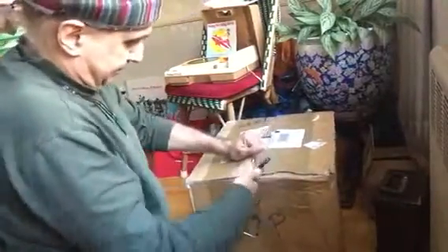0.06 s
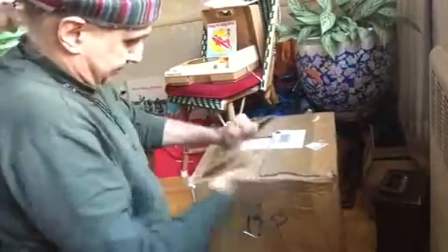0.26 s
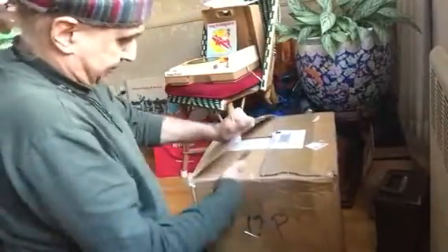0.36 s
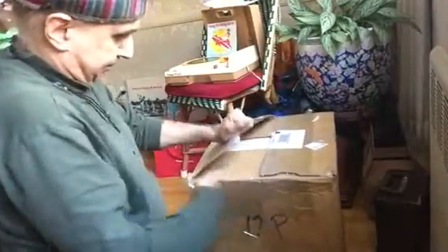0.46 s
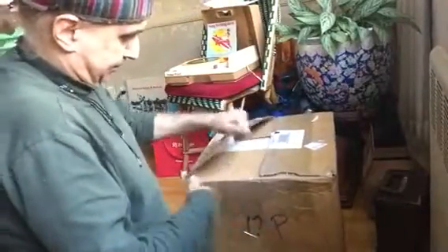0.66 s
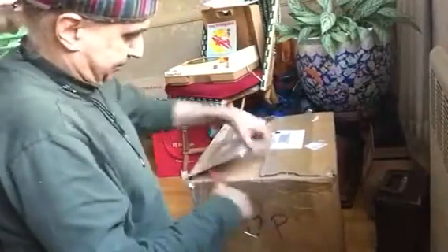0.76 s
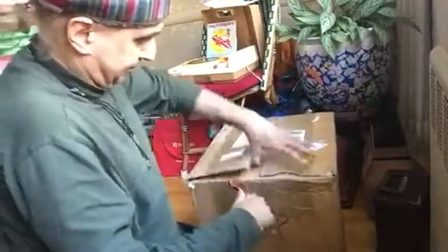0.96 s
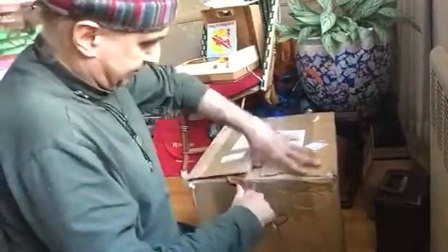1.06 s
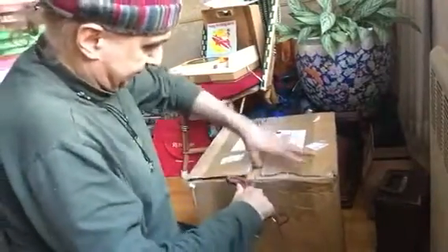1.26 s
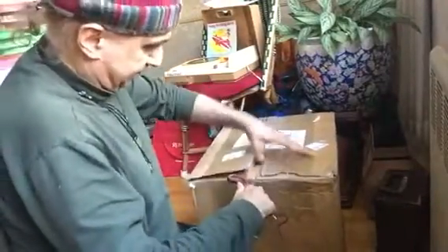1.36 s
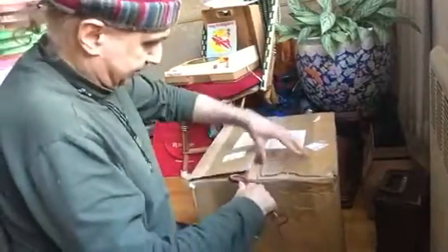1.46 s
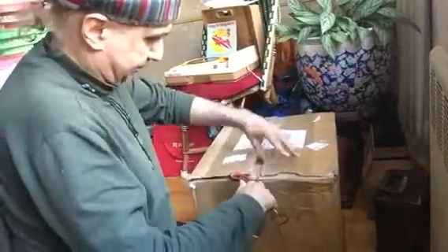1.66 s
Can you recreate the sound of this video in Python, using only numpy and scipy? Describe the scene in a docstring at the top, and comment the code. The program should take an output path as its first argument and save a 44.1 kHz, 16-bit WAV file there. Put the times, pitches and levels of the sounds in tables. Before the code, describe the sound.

Packing tape rips off a hollow cardboard box in short crackling bursts, close up, quiet room

```python
"""Packing tape on a cardboard box in a quiet room, heard by a microphone close by.
Over steady room air and rumble the pull begins as faint crackle of glue threads, with a first snap;
a blade hisses along the seam, and soft booms ring the air in the hollow box. Then the crackle surges
in bursts of shaped noise, with snaps (short rings and fizz) and knocks on the flap (decaying modes).
Late on a hand brushes the cardboard, a hum and a hiss, among the last small crackles and snaps."""
import sys
import numpy as np
from scipy import signal
from scipy.fft import rfft, irfft
from scipy.io import wavfile
from scipy.ndimage import uniform_filter1d

SR = 44100
rng = np.random.default_rng(int(sys.argv[2]) if len(sys.argv) > 2 else 0)


def makeup_ratio(level_db):
    """Linear amplitude ratio for a level in decibels (20 dB per factor of ten)."""
    decades = np.asarray(level_db, float) / 20
    return 10 ** decades


def store_pcm(level_fs):
    """Save levels as 16-bit WAV."""
    pcm = np.round(np.clip(level_fs, -1, 1) * 32767).astype(np.int16)
    wavfile.write(sys.argv[1], SR, np.atleast_2d(pcm).T)


N = 74970  # samples, 1.7 s


def evened(x):
    """Scales a sound to an rms of one."""
    return x / np.sqrt(np.mean(x ** 2) + 1e-20)


def peaked(x):
    """Scales a sound to a peak of one."""
    return x / (np.abs(x).max() + 1e-20)


def read(points, hz):
    """Reads a curve of (frequency, value) points along a logarithmic frequency axis."""
    f, value = np.transpose(points)
    return np.interp(np.log(hz + 1), np.log(f + 1), value)


def add(mix, s, sound):
    """Lays a sound into the mix from time s, cut off at the end of the mix."""
    part = mix[max(round(s * SR), 0):][:len(sound)]
    part += sound[:len(part)]


def resonate(x, hz, width_hz):
    """Two-pole resonance."""
    r = np.exp(-np.pi * width_hz / SR)
    return signal.lfilter([1, 0, -1], [1, -2 * r * np.cos(2 * np.pi * hz / SR), r * r], x)


def floor():
    """Room air, low rumble and microphone hiss: steady noise of one colour."""
    # spectrum of the background: f/Hz, relative level/dB
    background = [(18, -48), (30, -7.5), (161, 2), (499, -19.5), (1960, -28.5), (3220, -28), (6380, -38),
                  (13000, -39), (16000, -50)]
    level_db = -62
    colour = makeup_ratio(read(background, np.fft.rfftfreq(N, 1 / SR)))
    hiss = irfft(rfft(rng.standard_normal(N)) * colour, N)
    return makeup_ratio(level_db) * evened(hiss)


def flap_ring(t, tilt_db, bend=1):
    """The flap's modes after one blow; tilt (dB per octave) weights them, bending shifts them all."""
    # cardboard flap modes: f/Hz (unbent), level/dB (before tilt), t60/s
    modes = [(653, 6.5, 0.042), (740, 5, 0.044), (1062, -1.5, 0.06), (1260, 7.5, 0.036), (1790, -9, 0.075),
             (2376, 3, 0.06), (2629, 6, 0.077), (3124, 2, 0.068), (3590, 3, 0.017), (4760, -1, .008),
             (6500, -11, 0.0068)]
    lowest_hz = modes[0][0]
    ring = 0
    for hz, db, t60 in modes:
        decay = makeup_ratio(db + tilt_db * np.log2(hz / lowest_hz) - 60 * t / t60)
        ring = ring + decay * np.sin(2 * np.pi * hz * bend * t)
    return ring


def pull():
    """Thousands of tiny glue threads tear each second, crackling in the tape and rattling the flap."""
    # course of the pull: t/s, crackle level/dB, brightness/(dB per octave)
    course = [(0, -62.5, 0.5), (0.094, -58, -1), (0.121, -69, -1.5), (0.164, -59.5, -0.5),
              (0.204, -47.5, -2.5), (.222, -30.5, 2), (0.241, -38.5, -0.5), (0.252, -25, 1),
              (0.307, -45, 0.5), (0.319, -34.5, 5), (0.362, -41.5, 0.5), (0.427, -57.5, 1),
              (.46, -74.5, 2.5), (0.515, -70.5, 2.5), (0.519, -42, 0), (0.572, -37, 3.5),
              (0.619, -48.5, 0.5), (0.659, -55.5, -0.5), (0.671, -48.5, 5), (0.724, -68.5, 1.5),
              (0.744, -49, 1), (0.82, -51, 2.5), (0.897, -65, 1.5), (0.928, -55, -2.5), (1.025, -69, -0.5),
              (1.33, -70.5, -0.5), (1.338, -54.5, 1), (1.39, -69, 0), (1.442, -57.5, 1), (1.48, -77, 3.5)]
    # colour of the tearing tape: f/Hz, relative level/dB
    tape = [(180, 1.5), (300, -5), (603, 4), (1560, -0.5), (2610, -2.5), (3760, -3), (7440, -6.5),
            (16000, -20)]
    crackles_per_s, size_spread_db, grain_s = 6000, 3.5, 0.0002
    patchy_db = 2.5
    # rattle against crackle; duller pulls shake the flap more
    rattle_base_db, rattle_db_per_brightness = -14, -1
    rattle_tilt_db = 3.5  # per octave
    s, db, bright = np.transpose(course)
    rattle_db = rattle_base_db + rattle_db_per_brightness * bright

    torn = rng.random(N) < crackles_per_s / SR
    size = makeup_ratio(size_spread_db * np.minimum(rng.exponential(1, N), 5)) * torn
    grains = signal.lfilter([1], [1, -np.exp(-1 / (grain_s * SR))], size)
    threads = grains * rng.standard_normal(N)

    hz, t, z = signal.stft(threads, SR, nperseg=256, noverlap=192)
    # random patches, smooth over time and frequency, make the crackle uneven
    patches = uniform_filter1d(rng.standard_normal(z.shape[::-1]), 10, 0)
    patches = evened(uniform_filter1d(patches, 5, 1)).T
    # brightness turns about 4 kHz
    tilt = np.log2(np.maximum(hz, 500) / 4000)[:, None] * np.interp(t, s, bright)
    colour = makeup_ratio(read(tape, hz)[:, None])
    shaped = z * colour * makeup_ratio(tilt + patchy_db * patches)
    crackle = signal.istft(shaped, SR, nperseg=256, noverlap=192)[1][:N]

    ring = flap_ring(np.arange(4096) / SR, rattle_tilt_db)
    rattle = evened(signal.oaconvolve(threads, ring)[:N])
    time = np.arange(N) / SR
    both = evened(crackle) + makeup_ratio(np.interp(time, s, rattle_db)) * rattle
    return makeup_ratio(np.interp(time, s, db)) * both


def snaps():
    """A sharp pulse and brief splintering ring the loose tape and the flap under it, and fizz on top."""
    # single snaps: t/s (before the delay), peak level of the ring/dB, ring f/Hz, fizz over ring/dB
    snap_list = [(0.0142, -40.5, 2650, 7.5), (0.2098, -37, 1500, 10), (0.2487, -18, 2450, 7),
                 (0.3299, -39, 2630, 8), (0.5656, -43, 2640, 0), (0.607, -37.5, 2570, 9),
                 (0.6696, -40.5, 2330, -1), (0.7419, -39.5, 2170, 17), (0.7497, -40.5, 3470, -9),
                 (0.7803, -28, 3430, -2), (0.827, -42, 1120, 0), (0.9203, -37.5, 2170, -10),
                 (0.9214, -38, 1620, -18), (1.3336, -34, 1260, 12.5), (1.3997, -41.5, 3140, 5),
                 (1.4287, -49, 2550, -24), (1.4368, -41.5, 6500, -6), (1.442, -46.5, 1260, 6),
                 (1.499, -45, 3500, -26), (1.5894, -54, 1240, -31), (1.6181, -36, 3500, -8)]
    delay_s = 0.0008  # each snap sounds this long after its listed time
    pulse_size = 5  # the sharp pulse that opens each snap, against the splintering noise
    crack_s, treble_crack_s = 0.0013, 0.0013
    ring_width_hz, treble_hz = 900, 5500
    broad_db, tilt_db = 10, -4.5  # flap over ring, fall of its modes per octave
    thin_hz, grip_s = 2950, 0.004  # snaps ringing above this hardly move the flap; the tape damps it soon
    t, out = np.arange(1024) / SR, np.zeros(N)
    body = np.gradient(flap_ring(t, tilt_db) * np.exp(-t / grip_s))
    high = signal.butter(4, treble_hz, "high", fs=SR, output="sos")
    noises = rng.standard_normal((len(snap_list), 2, 1024))
    for (s, db, hz, treble_db), noise in zip(snap_list, noises):
        crack = (noise[0] + pulse_size * (t < 2.5 / SR)) * np.exp(-t / crack_s)
        ring = resonate(crack, hz, ring_width_hz)
        ring = peaked(resonate(ring, hz, ring_width_hz * 2))
        treble_crack = (noise[1] + pulse_size * (t < 1 / SR)) * np.exp(-t / treble_crack_s)
        fizz = peaked(signal.sosfilt(high, treble_crack))
        flap = peaked(np.convolve(crack * np.exp(-t / crack_s), body)[:1024])
        flap_gain = makeup_ratio(broad_db) / (1 + (hz / thin_hz) ** 10)
        add(out, s + delay_s, makeup_ratio(db) * (ring + flap_gain * flap + makeup_ratio(treble_db) * fizz))
    return out


def stroke(s, length, db):
    """Quick rise, hold, softer fall to silence a quarter length beyond the nominal end."""
    u = (np.arange(N) / SR - s) / length
    rise, fall = u * 4, (1 - u) * 2 + 0.5
    return makeup_ratio(db) * np.clip(np.minimum(rise, fall), 0, 1)


def rubs():
    """Smooth rubbing noise: the blade hisses in the seam; the hand sets the flap humming and hisses."""
    # blade dragging along the seam: t/s, nominal length/s, level/dB, f/Hz, width/Hz
    drag = (.03, .07, -64, 5600, 1200)
    # hand brushing over the cardboard: t/s, nominal length/s, level of the hum/dB
    brush = (1.026, 0.042, -54)
    hand_tilt_db = -3.5  # per octave
    brush_hiss_hz, brush_hiss_db = 5800, -10  # hiss lies above this, level against the hum
    hand, blade, air = rng.standard_normal((N, 3)).T
    s, length, db, hz, width_hz = drag
    scrape = evened(resonate(resonate(blade, hz, width_hz), hz, width_hz))
    hum = evened(signal.oaconvolve(hand, flap_ring(np.arange(4096) / SR, hand_tilt_db))[:N])
    high = signal.butter(4, brush_hiss_hz, "high", fs=SR, output="sos")
    hiss = evened(signal.sosfilt(high, air))
    return stroke(s, length, db) * scrape + stroke(*brush) * (hum + makeup_ratio(brush_hiss_db) * hiss)


def box():
    """The air in the box swells and dies after each push; two sways add brief low tones."""
    # pushes that set the box's air ringing: t/s, peak level/dB, f/Hz
    booms = [(0.087, -46.5, 123), (0.24, -33, 152), (0.368, -43.5, 131.4), (0.523, -37.5, 129),
             (0.56, -35.5, 127.5), (0.642, -47.5, 131), (0.792, -49.5, 133), (0.916, -45, 133),
             (0.975, -34, 125.2), (1.052, -45.5, 117.6), (1.26, -44, 128), (1.341, -51, 162.6),
             (1.435, -53.5, 131)]
    # the box swaying as the flap lifts: t/s (middle), peak level/dB, f/Hz, length/s
    sways = [(0.39, -54.5, 46, 0.084), (0.33, -49, 105, 0.14)]
    rise_s, t60_s = 0.0038, 0.14
    t, out = np.arange(SR // 2) / SR, np.zeros(N)
    swell = peaked((1 - np.exp(-t / rise_s)) ** 2 * makeup_ratio(-60 * t / t60_s))
    for s, db, hz in booms:
        add(out, s, makeup_ratio(db) * swell * np.sin(2 * np.pi * hz * t))
    time = np.arange(N) / SR
    for s, db, hz, length in sways:
        bell = np.exp(-(2 * (time - s) / length) ** 2)
        out += makeup_ratio(db) * bell * np.sin(2 * np.pi * hz * (time - s))
    return out


def knocks():
    """Each soft blow rings the flap, its low modes most."""
    # blows on the flap: t/s, peak level/dB, bend (factor on the modes' pitch)
    blows = [(0.22, -21, 1.055), (0.235, -29.5, 0.94), (0.519, -30.5, 1.06), (0.743, -32, 0.94),
             (0.972, -44, 1.17), (1.07, -51.5, 0.58), (1.258, -55, 0.78), (1.432, -50, 0.99)]
    tilt_db, rise_s = -14, 0.0012  # tilt per octave
    t, out = np.arange(4096) / SR, np.zeros(N)
    for s, db, bend in blows:
        ring = flap_ring(t, tilt_db, bend) * (1 - np.exp(-t / rise_s))
        add(out, s, makeup_ratio(db) * peaked(ring))
    return out


def room(x):
    """The room's echo: sparse taps of random sign, each band dying at its own speed."""
    # reverberation of the room: f/Hz, t60/s
    decay = [(800, 0.29), (2500, 0.29), (14000, 0.075)]
    taps = np.zeros(SR // 2)
    at = np.arange(60, SR // 2 - 12, 12)  # one tap in every 12 samples
    taps[at + rng.integers(0, 12, at.shape)] = rng.choice([-1., 1.], at.shape)
    hz, t, z = signal.stft(taps, SR, nperseg=128)
    dying = z * makeup_ratio(-60 * t / read(decay, hz)[:, None])
    tail = signal.istft(dying, SR, nperseg=128)[1]
    return signal.fftconvolve(x, tail / np.linalg.norm(tail))[:N]


def scene():
    """Tape, flap and rubbing with their echo in the room, over the box's air and the background."""
    room_db = -13
    background = floor()
    near = pull() + snaps() + rubs() + knocks()
    return (background + near + makeup_ratio(room_db) * room(near) + box())[None]


def roll_off(x):
    """The treble ends steeply here."""
    return signal.sosfilt(signal.butter(12, 16800, fs=SR, output="sos"), x)


def record(dry):
    """The close microphone drops the deepest bass and the top, and dips in the treble."""
    low_hz, top_hz = 40, 15700
    dip_hz, dip_width_hz, dip_db = 10400, 600, -6
    hz = np.fft.rfftfreq(N, 1 / SR)
    dip = makeup_ratio(dip_db * np.exp(-((hz - dip_hz) / dip_width_hz) ** 2))
    top_cut = 1 / (1 + (hz / top_hz) ** 40)
    dipped = irfft(rfft(dry) * dip * top_cut, N)
    low_cut = signal.butter(4, low_hz, "high", fs=SR, output="sos")
    return roll_off(signal.sosfilt(low_cut, dipped))


dry = scene()
out = record(dry)
store_pcm(out)
```